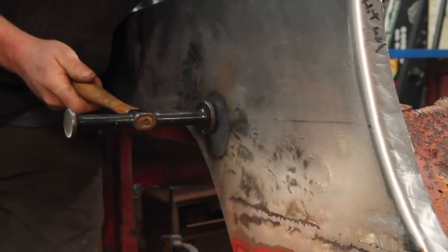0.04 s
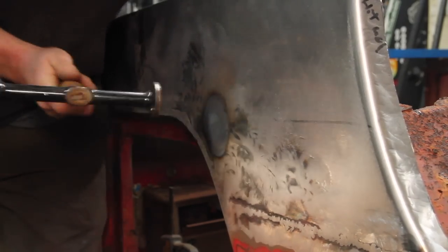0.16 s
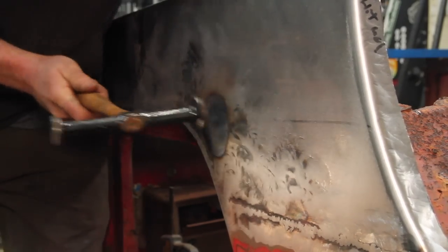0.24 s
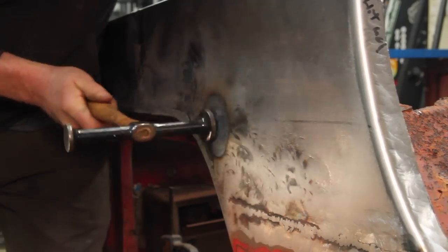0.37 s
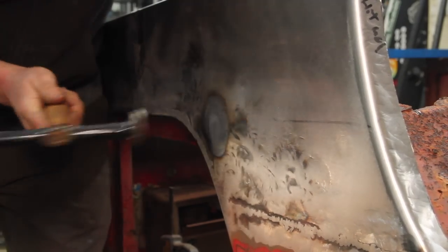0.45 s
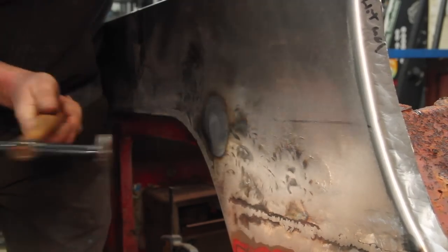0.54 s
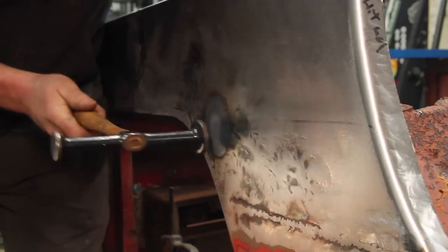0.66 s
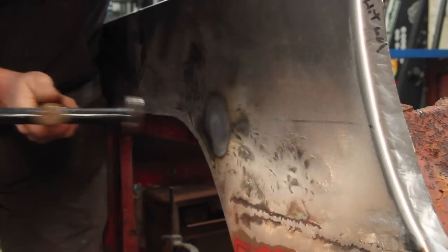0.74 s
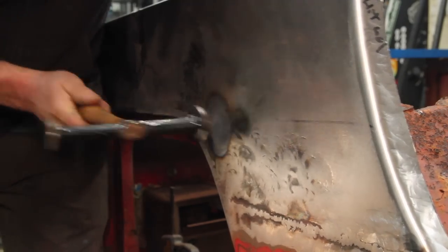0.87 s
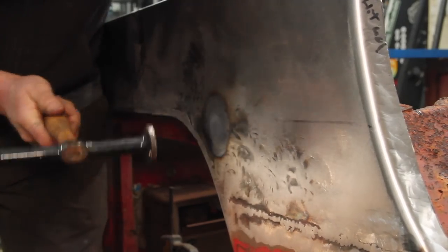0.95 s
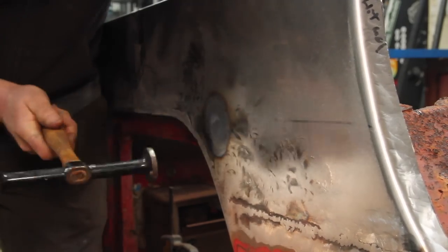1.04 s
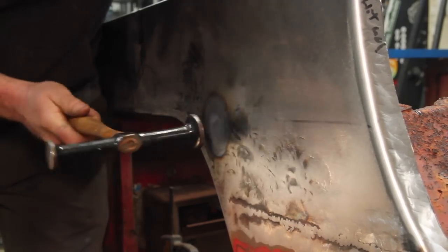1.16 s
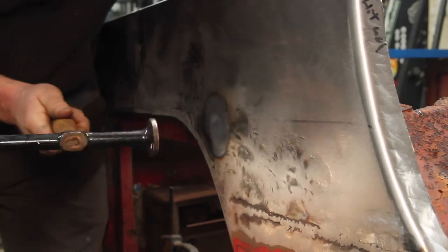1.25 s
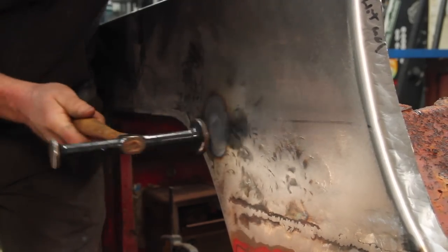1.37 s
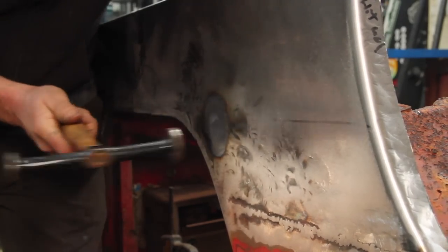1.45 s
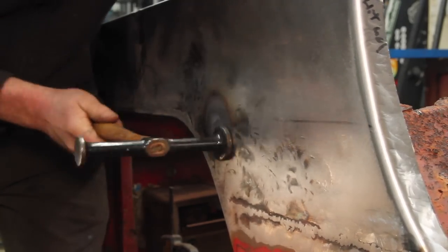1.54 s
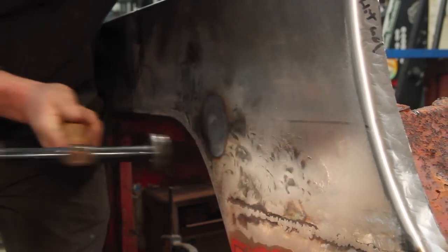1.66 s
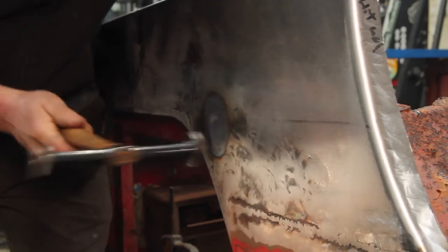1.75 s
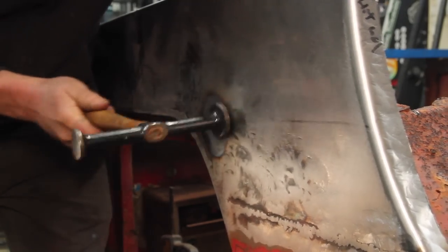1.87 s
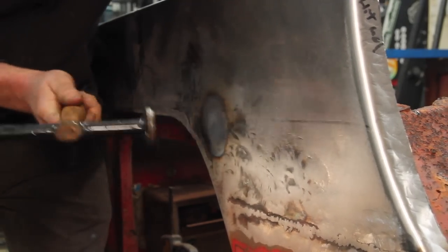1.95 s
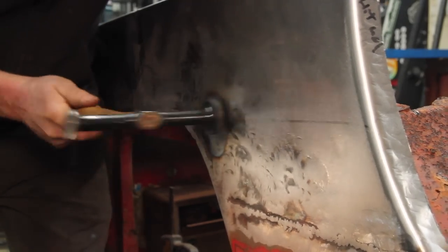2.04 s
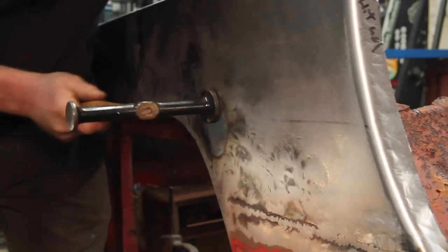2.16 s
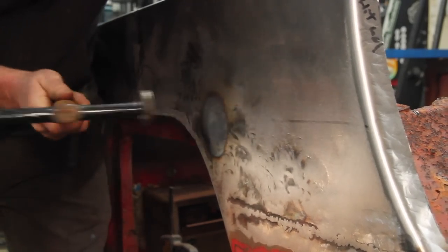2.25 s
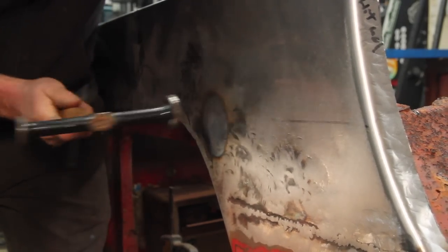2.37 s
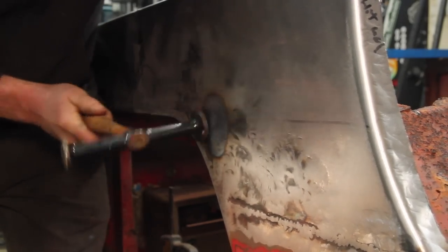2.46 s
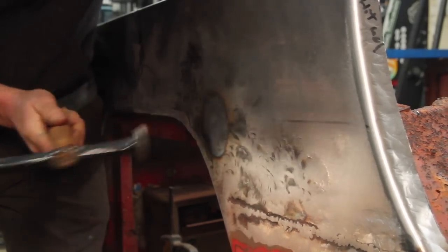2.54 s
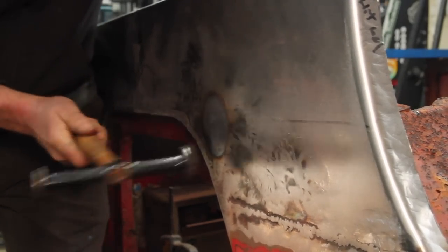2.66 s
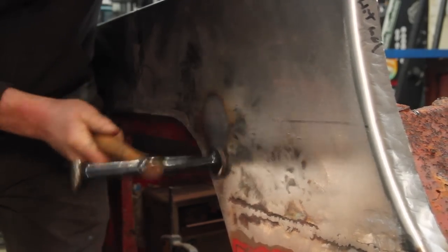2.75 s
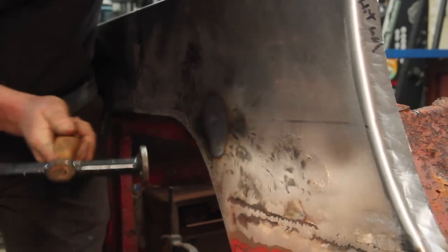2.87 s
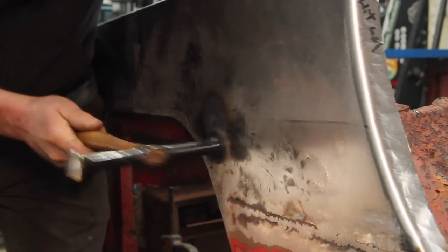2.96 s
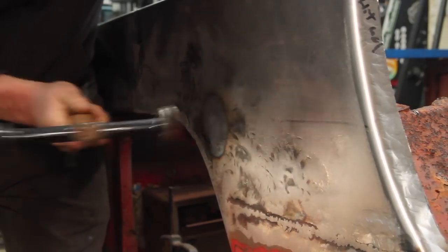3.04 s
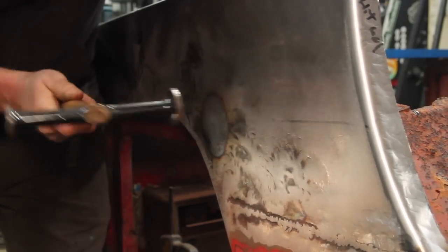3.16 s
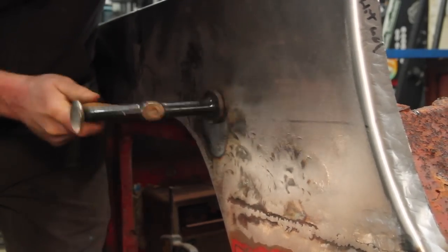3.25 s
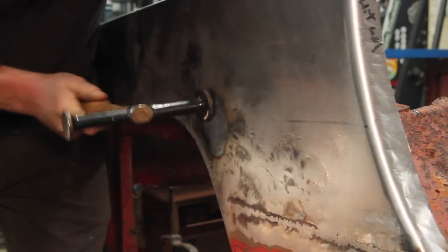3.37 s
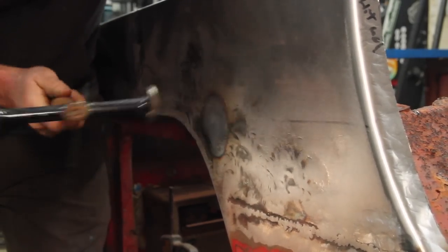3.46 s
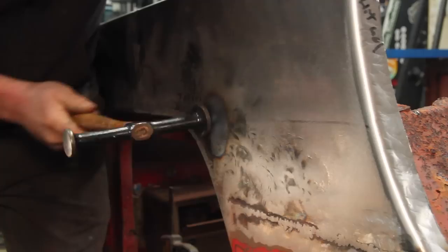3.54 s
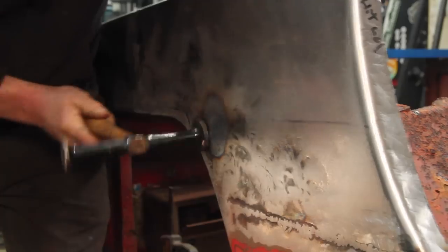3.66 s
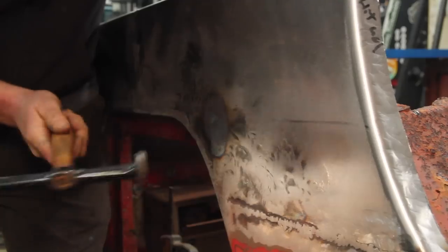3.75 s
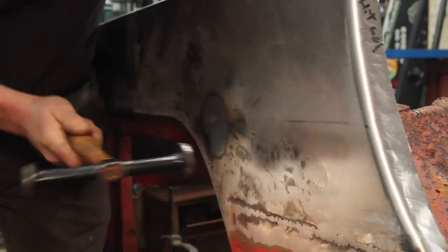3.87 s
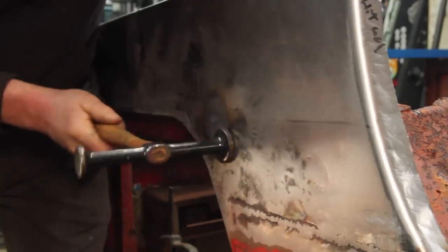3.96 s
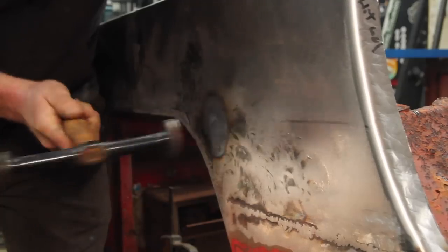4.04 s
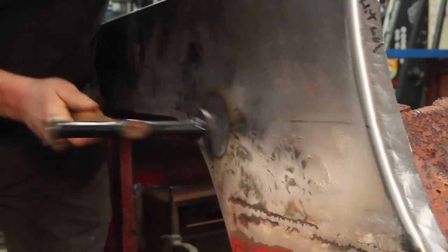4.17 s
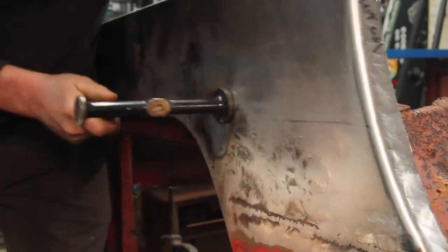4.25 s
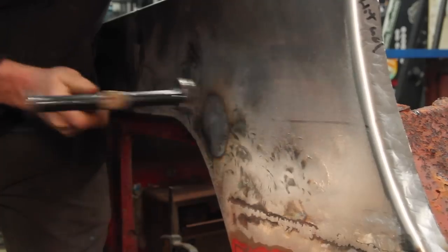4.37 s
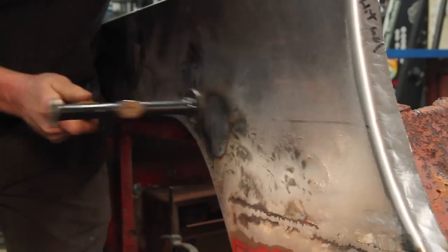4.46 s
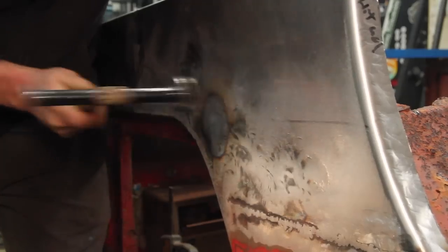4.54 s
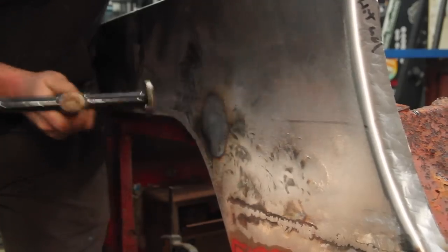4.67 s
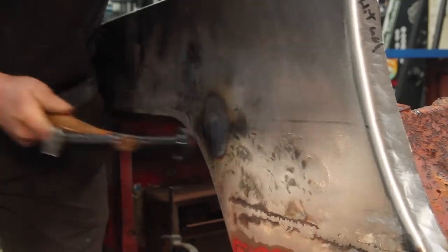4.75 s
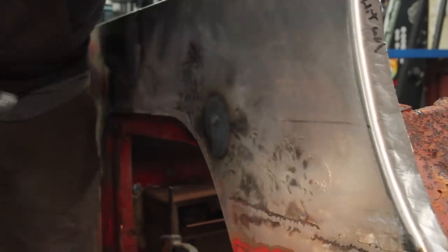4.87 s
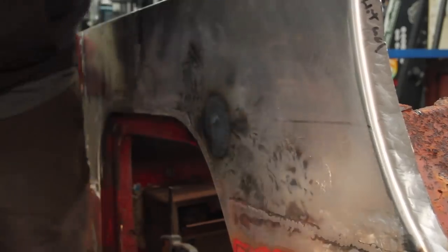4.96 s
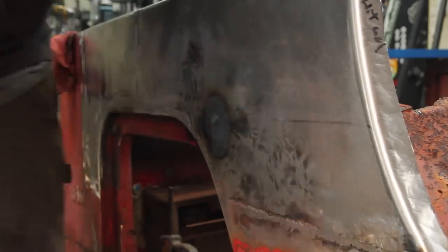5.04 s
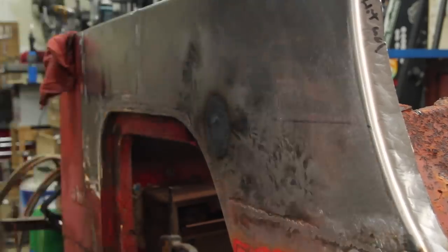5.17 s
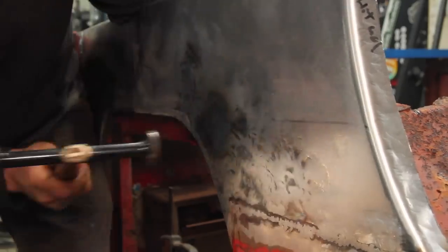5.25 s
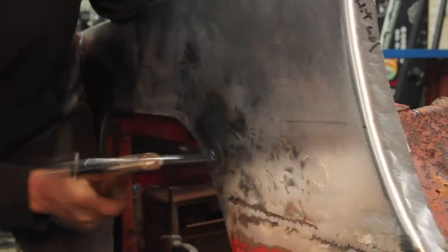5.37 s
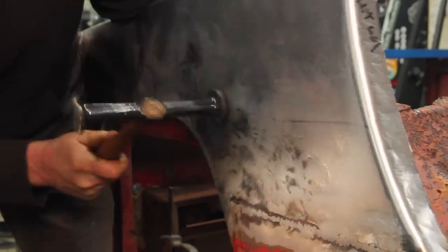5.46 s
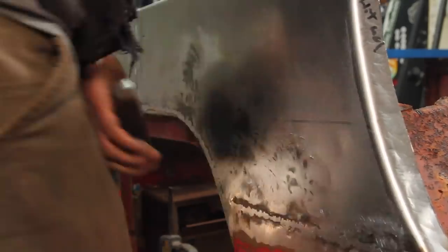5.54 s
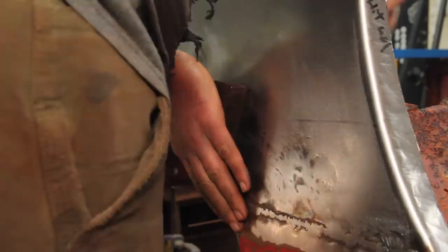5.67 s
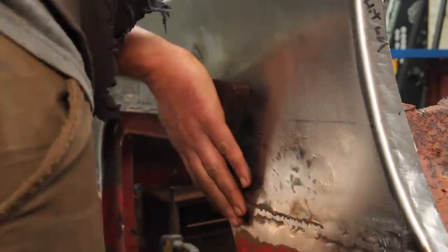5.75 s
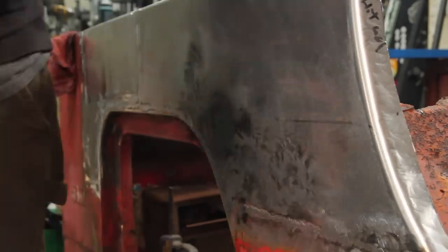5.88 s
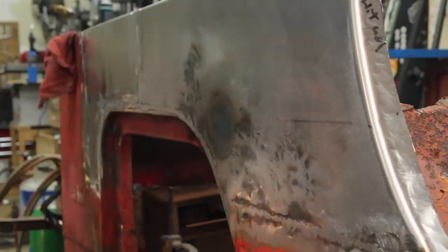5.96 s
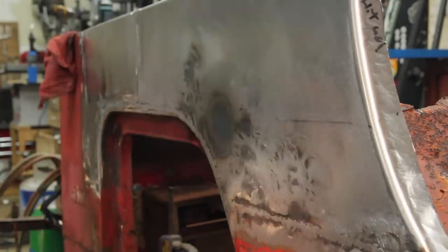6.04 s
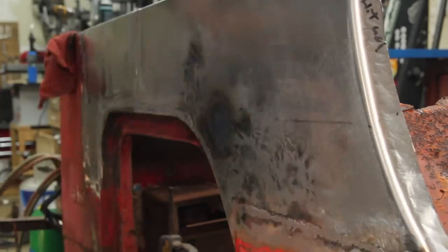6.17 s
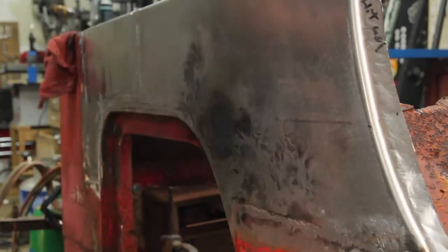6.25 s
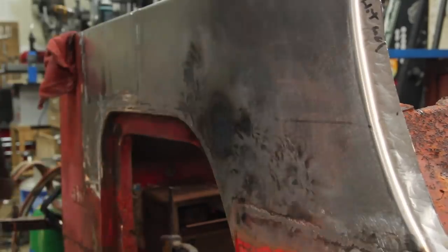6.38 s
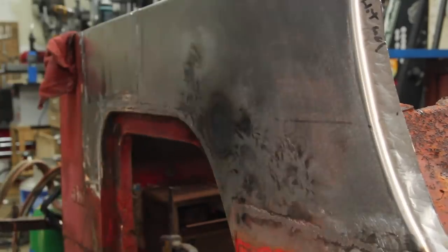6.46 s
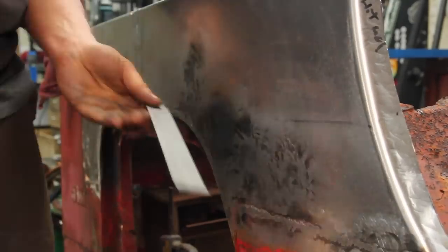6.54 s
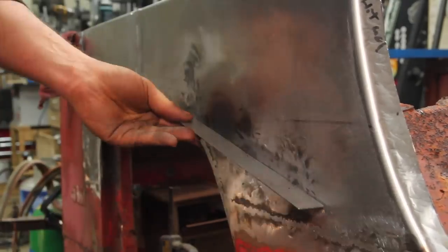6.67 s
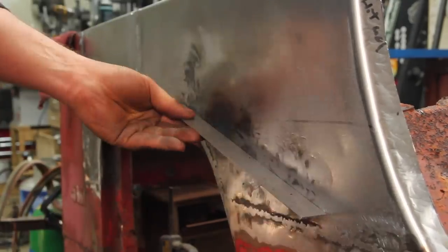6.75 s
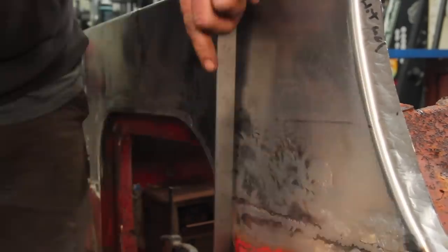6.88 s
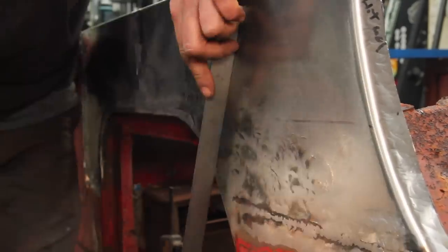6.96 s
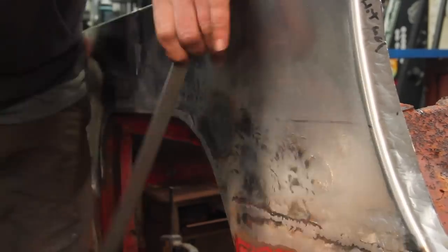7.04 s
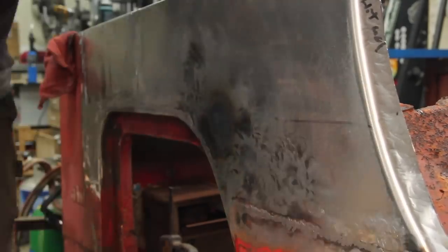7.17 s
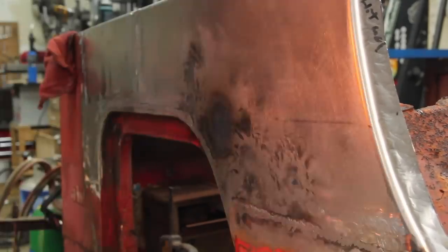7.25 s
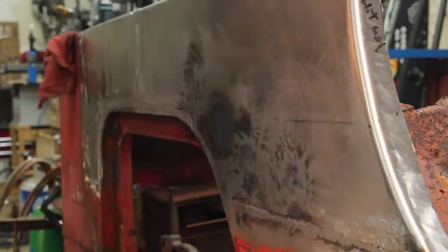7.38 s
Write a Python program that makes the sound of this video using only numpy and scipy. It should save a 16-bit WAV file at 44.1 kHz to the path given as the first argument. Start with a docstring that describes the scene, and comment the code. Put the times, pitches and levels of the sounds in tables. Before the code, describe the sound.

A hammer beats a sheet-steel car panel in a quiet workshop, so close that the attacks overload the microphone. The tail of an earlier blow fades at the start. Three single blows land at about 0.25, 0.4 and 0.9 seconds, each a short metallic crash, the second leaving a thin singing tone. Light touches and rebounds follow. From 1.6 to 4.75 seconds comes an even run of six or seven blows a second, the hammer head adding a high ring that swells and fades, brightest around 3 and 4 seconds. After a short pause, from 5.3 to 5.8 seconds, chopped fragments of blows stutter abruptly. Then hands and a steel rule make faint, brief scuffs on the panel, ending with a soft low bump near 7.25 seconds. Still air and a faint hum lie underneath.

```python
"""A workshop: a planishing hammer beats a sheet-steel car panel, so near that the microphone overloads.
Each blow sets the panel crashing and the steel head ringing: three single blows, light touches, then an
even run. The squarer a blow lands, the more the head rings and the brighter the crash.
From 5.3 s the work runs in time-lapse: abrupt slices of further blows with a faint knock among them, then
hands and a steel rule scuffing the panel. Still air and a faint hum lie underneath."""
import sys
import numpy as np
from scipy import signal
from scipy.fft import rfft, irfft, next_fast_len
from scipy.io import wavfile
from scipy.ndimage import uniform_filter1d

SR = 44100
rng = np.random.default_rng(int(sys.argv[2]) if len(sys.argv) > 2 else 0)


def log_audio(samples):
    """Write samples as a 16-bit WAV file to the path given in sys.argv[1]."""
    # one column per channel
    frames = np.atleast_2d(samples).T
    # limit to full scale, then quantise
    limited = np.clip(frames, -1, 1)
    pcm = np.round(limited * 32767).astype(np.int16)
    wavfile.write(sys.argv[1], SR, pcm)


N = 326781
TOP_HZ = 16000
SHOT = 22500  # samples in a one-shot; AGE and HZ are its time and frequency axes
AGE, HZ = np.arange(SHOT) / SR, np.fft.rfftfreq(SHOT, 1 / SR)


def amp(db):
    """Decibels to gain."""
    return 10 ** (np.asarray(db) / 20)


def unit(x):
    """Scales to an rms of one."""
    return x / np.sqrt(np.mean(x ** 2) + 1e-20)


def curve(points, hz):
    """Joins breakpoints by straight lines on a log-frequency axis."""
    f, value = np.transpose(points)
    return np.interp(np.log(hz + 1), np.log(f + 1), value)


def bell(centre_hz, octaves):
    """A bell-shaped band on a log-frequency axis."""
    return np.exp(-.5 * (np.log2((HZ + 1) / centre_hz) / octaves) ** 2)


def tilt(bright_db, hz):
    """A harder, shorter contact tips the spectrum to the treble: about bright_db an octave, pivot 1 kHz."""
    return amp(bright_db * np.log2((hz + 500) / 1500))


def decay(t60):
    """A fall of 60 dB in t60 seconds."""
    return np.exp(-np.log(1000) * AGE / t60)


def noise(gain):
    """Noise of rms one, coloured by a gain per frequency bin."""
    return unit(irfft(gain * rfft(rng.standard_normal(2 * len(gain) - 2))))


def wobble(count, size):
    """A smooth random curve of rms one that changes over about size points."""
    return unit(uniform_filter1d(uniform_filter1d(rng.standard_normal(count), size), size))


def gate(x, seconds, ramp_s):
    """The start of a sound, with short ramps at both ends."""
    t = AGE[:len(x)]
    return x * np.clip(np.minimum(t, seconds - t) / ramp_s, 0, 1)


def add(mix, start, sound):
    """Mixes a sound in at a time; one that starts before zero leaves only its tail."""
    at = round(start * SR)
    sound = sound[max(-at, 0):]
    part = mix[max(at, 0):][:len(sound)]
    part += sound[:len(part)]


# colour of the still air: f/Hz, relative level/dB
AIR_COLOUR = [(20, -15), (60, -10.5), (130, -3.5), (230, -7.5), (330, -3), (480, -12.5), (1100, -18.5),
              (2500, -22.5), (5000, -29.5), (14000, -38), (16000, -48.5)]
# tones of the hum: f/Hz, level/dB
HUM_TONES = [(118.4, -86), (328.4, -80), (689, -84.5)]


def room_tone(air_db=-68):
    """The bed: quiet workshop air with a faint hum."""
    t, hz = np.arange(N) / SR, np.fft.rfftfreq(2 * next_fast_len(N // 2 + 1), 1 / SR)
    hum = sum(amp(db) * np.sqrt(2) * np.sin(2 * np.pi * (f * t + rng.random())) for f, db in HUM_TONES)
    return amp(air_db) * noise(amp(curve(AIR_COLOUR, hz)))[:N] + hum


# a faint, dull knock cut short among the time-lapse slices (first row), then hand and rule scuffing:
# t/s, length/s, level/dB, centre f/Hz
SMALL_NOISES = [(5.604, .032, -57.5, 398), (5.812, 0.031, -56, 1500), (5.905, .04, -66, 1800),
                (6.125, 0.042, -67, 141.3), (6.427, 0.024, -56.5, 2270), (6.455, 0.021, -56, 1500),
                (6.819, 0.038, -62, 1200), (6.909, 0.038, -54, 2400), (7.056, 0.032, -60.5, 1000),
                (7.148, 0.05, -53.5, 11000), (7.254, 0.035, -46.5, 189)]


def small_noises(grain_db=3, rub_s=0.054, rub_db=-63.5, rub_hz=(140, 1010)):
    """Grainy bursts: a dull knock, scuffs on the steel, and rubs of random colour as the rule is laid on."""
    out = np.zeros(N)
    rubs = [(start, rub_s, rub_db, np.exp(rng.uniform(*np.log(rub_hz))))
            for start in np.linspace(6.606, 7.115, 5)]
    for start, length, db, centre_hz in SMALL_NOISES + rubs:
        band = noise(bell(centre_hz, octaves=1.4))
        grain = amp(grain_db * wobble(SHOT, size=120))
        add(out, start, amp(db) * gate(unit(band * grain), length, ramp_s=0.0014))
    return out


# thin tones in the sheet: t/s, f/Hz, level/dB, t60/s
SHEET_TONES = [(0.41, 2290, -45.5, 0.5), (4.746, 2316, -54, 0.57)]


def singing():
    """Two of the blows leave a thin tone singing in the sheet."""
    out = np.zeros(N)
    for start, hz, db, t60 in SHEET_TONES:
        add(out, start, amp(db) * decay(t60) * np.sin(2 * np.pi * hz * AGE))
    return out


# touches and rebounds, except at 3.108 s: a brief swell of noise leading into the blow at 3.116 s
# t/s, level/dB, low-pass f/Hz
PANEL_STIRS = [(.625, -52, 3000), (0.741, -39.5, 2500), (.904, -12.5, 800), (.932, -14, 12200),
               (1.185, -31, 1200), (1.21, -21.5, 2390), (1.34, -35.5, 3000), (1.439, -41.5, 3000),
               (3.108, -16, 9000), (4.962, -40.5, 6000)]


def stirs(sheet):
    """The panel sounds alone, low-passed and faded in; the quieter the stir, the slower its attack."""
    out = np.zeros(N)
    for start, db, cutoff_hz in PANEL_STIRS:
        stir = signal.lfilter(*signal.butter(1, cutoff_hz, fs=SR), sheet(bright_db=0.36, spot_hz=750))
        attack_s = 0.00052 * 2 ** (-db / 10)  # doubles for each 10 dB down
        add(out, start, amp(db) * stir * (1 - np.exp(-AGE / attack_s)))
    return out


def overload(x, ceiling=0.16, knee=7, bass_hz=450, bass_headroom_db=4):
    """The microphone input flattens loud attacks; the bass has more headroom than the treble."""
    pole, zero = np.exp(-2 * np.pi * np.array([bass_hz, bass_hz / amp(bass_headroom_db)]) / SR)
    shelved = signal.lfilter([1, -zero], [1, -pole], x)
    clipped = shelved / (1 + abs(shelved / ceiling) ** knee) ** (1 / knee)
    return signal.lfilter([1, -pole], [1, -zero], clipped)


# slices of blows, each held until the next: t/s, offset into the blow/s, force level/dB, head ring/dB
BLOW_SLICES = [(5.28, .12, -3.5, -2), (5.295, 0.0033, -.5, 12), (5.3277, .044, 0, 15.5),
               (5.367, 0.1, -4, 11.5), (5.387, 0.004, 2, 13.5), (5.415, .028, -9, 12),
               (5.451, 0.13, -1.5, 3), (5.4964, .045, -4.5, 9), (5.51, .091, -6, 13),
               (5.537, 0.21, -4.5, 8), (5.6675, .09, -4.5, 6), (5.709, 0.0012, 5, -3),
               (5.716, 0.076, -10, 8), (5.728, 0.0027, 1, 8.5), (5.754, 0.073, -16, 7)]


def time_lapse(strike, end_s=5.764, level_db=-3):
    """A stutter of attacks and tails from separate overloaded blows, butted together."""
    out = np.zeros(N)
    ends = [row[0] for row in BLOW_SLICES[1:]] + [end_s]
    for (start, offset, force_db, ring_db), end in zip(BLOW_SLICES, ends):
        blow = overload(strike(force_db, ring_db, bright_db=2.5, spot_hz=700))
        add(out, start, gate(blow[round(offset * SR):], end - start, ramp_s=.0002))
    return amp(level_db) * out


# colour of the panel's dense modes: f/Hz, relative level/dB
CRASH_COLOUR = [(30, -14), (80, -11), (130, 2.5), (220, 1.5), (380, 0.5), (700, 4), (1200, -0.5),
                (2400, -3.5), (4200, -8), (5500, -10), (7000, -14.5), (11000, -17.5), (16000, -24.5)]
# their decay: f/Hz, t60/s
CRASH_DECAY = [(100, 0.24), (300, 0.28), (700, 0.18), (2000, 0.17), (5000, 0.15), (8000, .14),
               (14000, 0.089)]
# the workshop's tail under them: f/Hz, t60/s
ROOM_DECAY = [(150, 0.74), (700, 0.53), (3000, 0.58), (12000, 0.23)]
# modes that stand out of the crash: f/Hz, level/dB, t60/s
STRONG_MODES = [(142, -24, 0.32), (199.3, -23.5, 0.44), (230.8, -27, .4), (274.4, -31.5, .45),
                (318.5, -20, 0.22), (378.3, -16.5, 0.26), (394.4, -27, .35), (563, -37, 0.18),
                (641, -20.5, 0.26), (700, -47, 0.77), (1003, -19, 0.18), (2506, -21, 0.14)]


def panel(crash_db=-4, room_db=-32, shared=.4, ripple_db=2, spot_db=3, scatter_db=3, mode_attack_s=0.01):
    """Builds the sheet's voice: a crash of dense modes, a few clear tones and the room's tail."""
    band_hz = np.geomspace(80, TOP_HZ, 11)[:, None]
    bands = np.array([curve(np.c_[band_hz, row], HZ) for row in np.eye(len(band_hz))])
    # bending waves are dispersive: the treble fills the sheet at once, the bass arrives later
    attack_s = 0.0057 * (band_hz / 1000) ** -0.52
    tail = decay(curve(CRASH_DECAY, band_hz)) + amp(room_db) * decay(curve(ROOM_DECAY, band_hz))
    envelope = (1 - np.exp(-AGE / attack_s)) * tail
    hz, db, t60 = np.transpose(STRONG_MODES)[:, :, None]
    modes = amp(db) * decay(t60) * np.exp(2j * np.pi * hz * AGE) * (1 - np.exp(-AGE / mode_attack_s))
    colour = amp(curve(CRASH_COLOUR, HZ))
    common = noise(colour)

    def sheet(bright_db, spot_hz):
        """Neighbouring spots share part of their pattern of modes, but each favours its own groups."""
        pattern = rfft(shared * common + np.sqrt(1 - shared ** 2) * noise(colour))
        pattern *= unit(amp(ripple_db * wobble(len(HZ), size=130)))
        pattern *= amp(spot_db * bell(spot_hz, octaves=0.33))
        crash = (irfft(bands * pattern * tilt(bright_db, HZ)) * envelope).sum(0)
        drive = amp(scatter_db * rng.standard_normal(len(modes))) * tilt(bright_db, hz[:, 0])
        phase = np.exp(2j * np.pi * rng.random(len(modes)))
        return amp(crash_db) * crash + ((drive * phase) @ modes).imag
    return sheet


# the hammer head's lower and upper mode clusters: f/Hz, width/octaves, level/dB, t60/s
HEAD_CLUSTERS = [(5290, 0.037, -23, 0.17), (5710, 0.022, -26.5, 0.11)]


def head_ring(ring_db, lean_spread_db=1.64):
    """The steel head rings in two clusters of modes; each blow leans towards one by chance."""
    lean_db = lean_spread_db * rng.standard_normal()
    lower_db = .5 + ring_db + lean_db
    upper_db = 5.5 + .65 * ring_db - lean_db
    return sum(amp(db + drive_db) * noise(bell(hz, octaves)) * decay(t60)
               for drive_db, (hz, octaves, db, t60) in zip((lower_db, upper_db), HEAD_CLUSTERS))


def hammer(sheet, crack_db=-7, crack_s=0.0019, crack_hz=7000):
    """Builds the hammer's strike on the given sheet."""
    def strike(force_db, ring_db, bright_db, spot_hz):
        """One hit in three layers: the ringing head, the crack of steel on steel and the panel."""
        head = head_ring(ring_db)
        crack = amp(crack_db) * noise(bell(crack_hz, octaves=2)) * np.exp(-AGE / crack_s)
        return amp(force_db) * (head + crack + sheet(bright_db, spot_hz))
    return strike


# modes favoured by the struck spot as the hammer wanders over the sheet: t/s, f/Hz
SPOT_PATH = [(.4, 350), (.9, 430), (1.75, 370), (2.1, 190), (2.85, 400), (3.3, 220), (3.85, 160),
             (4.46, 190), (4.6, 1200)]
# hammer blows: t/s, force level/dB, head ring/dB
HAMMER_BLOWS = [(-0.19, -7.5, -12.5), (0.245, -7, -9.5), (0.4117, -5, -8), (0.8785, -6.5, -15.5),
                (1.584, -4.5, 5), (1.741, -4.5, 0.5), (1.8927, -6.5, 4.5), (2.045, -6.5, 4),
                (2.195, -7.5, 1.5), (2.3455, -6.5, 0.5), (2.496, -6.5, -1), (2.653, -5.5, 3.5),
                (2.804, -6.5, 8), (2.962, -6, 10), (3.116, -7, 3.5), (3.2582, -6.5, -0.5),
                (3.407, -5.5, -3.5), (3.557, -5.5, 3.5), (3.706, -7, 9.5), (3.854, -8, 8.5),
                (4.002, -7, 12.5), (4.152, -5.5, 4.5), (4.302, -6, -8), (4.446, -8, -3), (4.609, -8, -2),
                (4.747, -7, 4)]


def blows(strike):
    """The planishing: a squarer blow, or a spot with higher modes, gives a brighter crash."""
    out = np.zeros(N)
    for start, force_db, ring_db in HAMMER_BLOWS:
        spot_hz = np.interp(start, *np.transpose(SPOT_PATH))
        bright_db = 0.5 + 0.12 * ring_db + 0.39 * np.log2(spot_hz / 350)
        add(out, start, strike(force_db, ring_db, bright_db, spot_hz))
    return out


def scene():
    """The mono mix: one panel and one hammer serve every blow."""
    sheet = panel()
    strike = hammer(sheet)
    beating = overload(blows(strike) + stirs(sheet) + singing())
    return (beating + time_lapse(strike) + small_noises() + room_tone())[None]


def record(dry, low_cut_hz=35):
    """A gentle low cut and a steep roll-off at the top."""
    thinned = signal.lfilter(*signal.butter(1, low_cut_hz, "high", fs=SR), dry)
    low_pass = signal.firwin(255, TOP_HZ, window=("kaiser", 8), fs=SR)
    return signal.oaconvolve(thinned, low_pass[None], "same")


dry = scene()
out = record(dry)
log_audio(out)
```